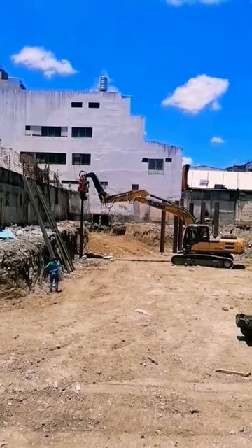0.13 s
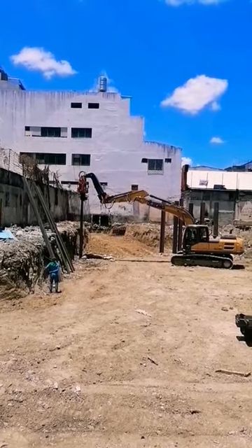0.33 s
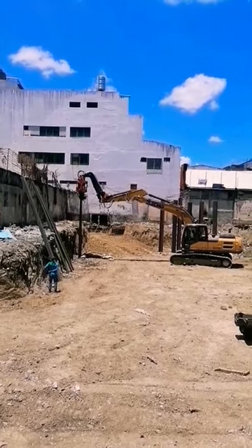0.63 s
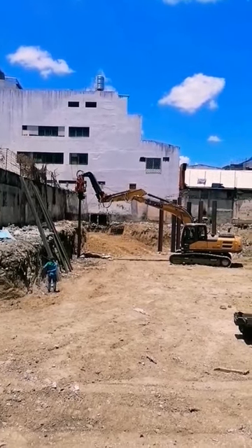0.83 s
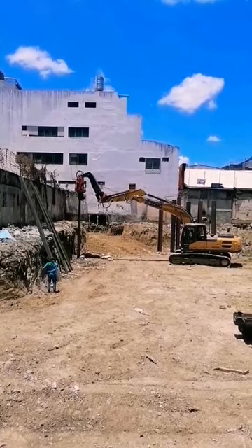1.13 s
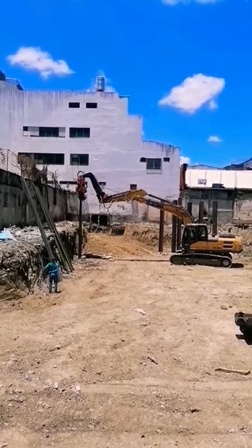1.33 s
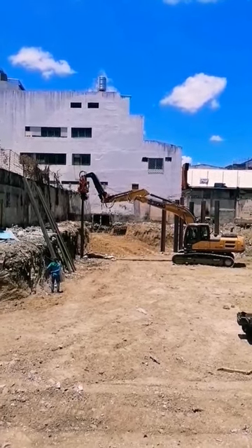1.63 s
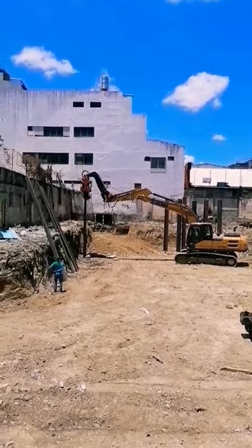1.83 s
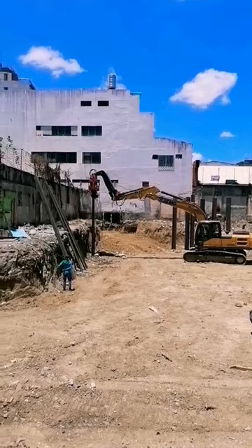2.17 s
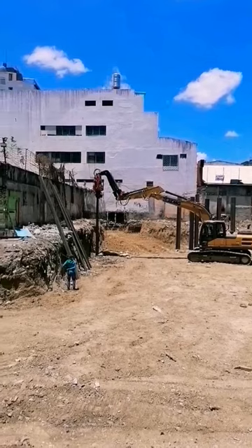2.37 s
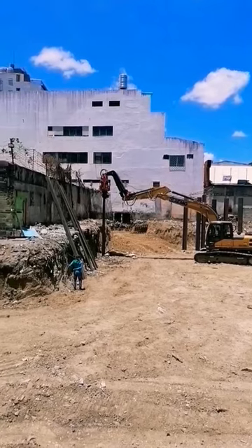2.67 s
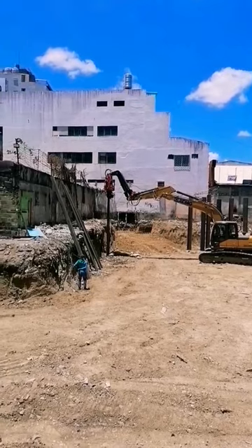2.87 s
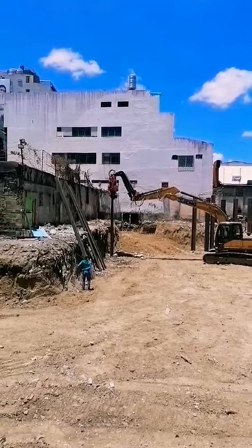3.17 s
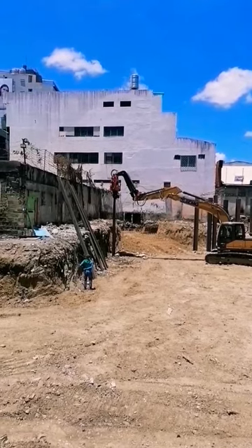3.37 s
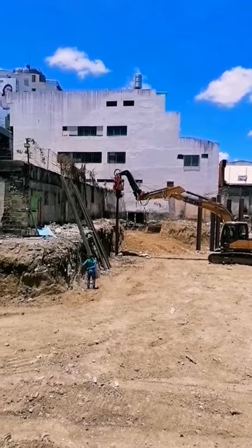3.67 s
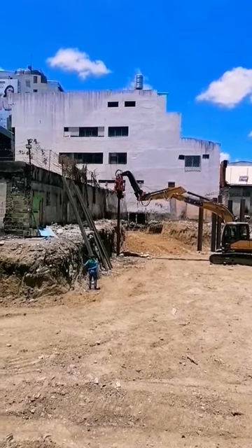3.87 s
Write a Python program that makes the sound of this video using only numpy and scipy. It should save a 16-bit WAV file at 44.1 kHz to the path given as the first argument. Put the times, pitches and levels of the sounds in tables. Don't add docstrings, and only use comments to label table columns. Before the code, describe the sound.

Pile driving with a vibrating hammer, heard across a walled building site on a phone: quiet low engine drone and hydraulic whine first, then loose clamp clanks, ground thuds and fast, uneven steel hammering to the end.

```python
import sys
import numpy as np
from scipy import signal
from scipy.fft import rfft, irfft, next_fast_len
from scipy.io import wavfile
from scipy.ndimage import map_coordinates

SR = 44100
rng = np.random.default_rng(int(sys.argv[2]) if len(sys.argv) > 2 else 0)


def elevation(decibels):
    levels = np.asarray(decibels, float)
    return 10 ** (levels / 20)


def transcribe(signal):
    frames = np.atleast_2d(signal).T
    limited = np.clip(frames, -1, 1)
    pcm = np.round(limited * 32767).astype(np.int16)
    wavfile.write(sys.argv[1], SR, pcm)


N = 176400
TIME_S = np.arange(N) / SR


def unit(x):
    return x / np.sqrt(np.mean(x ** 2) + 1e-20)


def along(points, hz):
    f, v = np.transpose(points)
    return np.interp(np.log(hz + 1), np.log(f + 1), v)


def curves(rows):
    s, *cols = np.transpose(rows)
    return [np.interp(TIME_S, s, c) for c in cols]


def wobble(rate_hz):
    knots = rng.standard_normal(int(N * rate_hz / SR) + 4)
    return map_coordinates(knots, [np.arange(N) * rate_hz / SR])


def phase(hz):
    return 2 * np.pi * np.cumsum(hz) / SR


def filtered(x, response):
    m = next_fast_len(N + SR // 2)
    return irfft(rfft(x, m) * response(np.fft.rfftfreq(m, 1 / SR)), m)[..., :N]


def shaped(x, points):
    return unit(filtered(x, lambda f: elevation(along(points, f))))


def ringing(modes):
    def response(f):
        total = 0
        for k, (center, width, db) in enumerate(modes):
            damping = 1j * f * width
            total = total + (-1) ** k * elevation(db) * damping / (center ** 2 - f * f + damping)
        return total
    return response


def air(f):
    air_hz = 5360
    return 1 / (1 + 1j * f / air_hz) ** 3


def far_ringing(modes):
    return lambda f: ringing(modes)(f) * air(f)


def grit(per_s, spread_db):
    chance, sign, size = rng.random((3, N))
    size_db = np.minimum(-spread_db * np.log(size + 1e-9), 12)
    return unit((chance < per_s / SR) * np.sign(sign - .5) * elevation(size_db))


def bursts(times_s, db, attack_s, hold_s, t60_s):
    t = np.clip(TIME_S - np.asarray(times_s)[:, None], 0, None)
    fall_db = 60 * np.clip(t - hold_s, 0, None) / t60_s
    each = elevation(np.asarray(db)[:, None] - fall_db) * (1 - np.exp(-t / attack_s))
    return np.sqrt(np.sum(each ** 2, axis=0))


# t/s, f/Hz, level/dB
FIRING = [
    (0, 65.1, -35),
    (.45, 66.1, -35.5),
    (.75, 66.1, -37),
    (1.75, 66.9, -40),
    (1.9, 67.06, -40),
    (2.2, 67.3, -41),
    (2.45, 65.4, -35.5),
    (2.75, 64.82, -36),
    (3.2, 65.6, -39),
    (4, 67.8, -38),
]
# t/s, f/Hz, level/dB
PUMP = [
    (0, 578, -60),
    (.25, 589.6, -48),
    (.45, 597.3, -43.5),
    (.75, 600.4, -42),
    (1.2, 602, -40.5),
    (1.95, 603, -39),
    (2.12, 608, -44.5),
    (2.4, 603, -48.5),
    (2.6, 592, -62),
]
# multiple of firing, level/dB under it
EXHAUST_ORDERS = [(2, -11.5), (3, -6.5), (4, -35)]
# f/Hz, level/dB per Hz
BLOCK = [(25, -18), (50, -6), (85, -8), (200, -6.5), (345, -15), (800, -22.5), (5000, -41), (9000, -48.5),
         (15000, -59)]
# f/Hz, width/Hz, level/dB
PANELS = [(190, 21, -3), (384.3, 7.2, -2.5), (560, 120, -6), (1263, 112, -13.5), (1614, 137, -15),
          (2270, 190, -19), (2650, 230, -21), (3880, 72, -25), (5000, 95, -23.5), (5450, 97, -21.5)]


def engine():
    firing_hz, firing_db = curves(FIRING)
    turn = phase(firing_hz + 1.03 * wobble(12))
    exhaust = elevation(0.29 * wobble(21)) * np.sin(turn)
    for multiple, db in EXHAUST_ORDERS:
        exhaust += elevation(db + 1.6 * wobble(22.2)) * np.sin(multiple * turn + 0.39 * wobble(9))
    pump_hz, pump_db = curves(PUMP)
    whine = elevation(pump_db + 0.74 * wobble(24.84)) * np.sin(phase(pump_hz + 2.25 * wobble(29.63)))
    block = shaped(rng.standard_normal(N), BLOCK)
    knock = 1 + 0.13 * np.sin(turn + 1.0)
    panels = unit(filtered(grit(7000, 1.8) * knock, far_ringing(PANELS)))
    ease_s, ease_db = 2.04, -0.5
    ease = ease_db * np.clip((TIME_S - ease_s) * 10, 0, 1)

    def swell():
        return elevation(ease + 0.14 * wobble(0.65) + 0.12 * wobble(11))

    tones = np.sqrt(2) * (elevation(firing_db) * exhaust + whine)
    return tones + elevation(-37) * block * swell() + elevation(-41) * panels * swell()


# t/s, f/Hz, level/dB
SQUEAKS = [(.03, 5390, -57), (.3, 5450, -58), (.36, 3960, -54), (.62, 4000, -55), (.63, 5537, -62),
           (.74, 5000, -68), (1.01, 5000, -62), (1.419, 5000, -58), (1.44, 3360, -55), (1.69, 5000, -62)]


def squeaks():
    total = np.zeros(N)
    for s, hz, db in SQUEAKS:
        song = unit(filtered(rng.standard_normal(N), ringing([(hz, 45, 0)])))
        total += song * bursts([s], [db], 0.033, 0.038, 0.27)
    return total


# t/s, peak level/dB, low share/dB, 66 Hz swell level/dB
CLANKS = [(2.537, -38.5, 17, -36), (2.601, -27.5, 6, -30), (2.687, -51, 20, -44), (2.766, -24, -0.5, -33),
          (2.803, -29, 9, -24), (2.851, -18, 1, -41), (2.9, -22, -4.5, -25), (2.937, -29, 2, -16.5),
          (2.971, -12.5, -9.5, -36), (2.994, -11.5, -10, -32), (3.009, -33, 2, -16.5),
          (3.037, -14, -6.5, -35)]
# f/Hz, width/Hz, level/dB
CLAMP_LOW = [(592, 35, -0.5), (806, 27, -20), (895, 7.8, -3), (984, 46, -5), (1108, 134, -10),
             (1298, 200, -12.5), (1546, 24, -8)]
CLAMP_HIGH = [(1790, 56, -22), (2236, 38, -2), (2334, 99, -8), (2687, 62, -7.5), (2800, 75, -14.5),
              (3286, 27, -10.5), (3730, 29, -23), (4090, 19, -14)]


def clamp():
    s, db, low_db, thud_db = np.transpose(CLANKS)
    high_hits = grit(12000, 1.7) * bursts(s, db + 15.5, 0.0017, 0.0023, 0.13)
    high = filtered(high_hits, far_ringing(CLAMP_HIGH))
    low_hits = grit(9000, 0.58) * bursts(s, db + low_db + 16.5, 0.00061, 0.0028, 0.16)
    low = filtered(low_hits, far_ringing(CLAMP_LOW))
    crack_noise = rng.standard_normal(N) * bursts(s, db + 8, 0.0028, 0.0024, 0.028)
    crack = filtered(crack_noise, lambda f: 1j * f / (1j * f + 700) * air(f) ** 2)
    thud = bursts(s, thud_db, 0.017, 0.015, 0.13) * np.sin(phase(66 + 3 * wobble(24.6)))
    return high + low + crack + thud


def struck(rows, rise_s, t60_s):
    out = np.zeros(N + SR)
    t = np.arange(SR // 4) / SR
    shape = (1 - np.exp(-(t / rise_s) ** 2)) * elevation(-60 * t / t60_s)
    shape /= shape.max()
    for s, hz, db in rows:
        start = round((s - rise_s) * SR)
        out[start:start + len(t)] += elevation(db) * shape * np.sin(2 * np.pi * hz * t)
    return out[:N]


# t/s, peak level/dB
SNAPS = [(2.542, -22), (3.148, -9), (3.221, 0), (3.2374, -20), (3.2942, -14), (3.3237, -20), (3.3824, -19),
         (3.5315, -16), (3.5529, -1), (3.6, -10), (3.774, -2), (3.7897, -11), (3.831, -2), (3.848, -10),
         (3.9134, -19), (3.9708, -18)]
# t/s, f/Hz, peak level/dB
RINGS = [(3.073, 533, -22.5), (3.075, 445, -17.5), (3.145, 837, -21.5), (3.151, 560, -15),
         (3.151, 430, -14), (3.215, 1086, -23.5), (3.221, 901, -22), (3.223, 257, -15), (3.223, 1320, -26),
         (3.227, 522, -15), (3.275, 631, -19), (3.285, 830, -24), (3.287, 1071, -22), (3.296, 420.6, -16.5),
         (3.306, 610, -27), (3.312, 325, -21), (3.342, 252, -25.5), (3.352, 1062, -22), (3.366, 499, -18),
         (3.37, 1527, -28), (3.412, 538, -18), (3.464, 1093, -29), (3.464, 442, -26), (3.47, 556, -20.5),
         (3.528, 1060, -27), (3.532, 412, -24.5), (3.536, 193, -18), (3.568, 592, -27), (3.594, 486, -21.5),
         (3.604, 196, -18), (3.622, 528, -35), (3.65, 1030, -23.5), (3.674, 572, -19.5), (3.72, 218, -21),
         (3.763, 513, -19.5), (3.763, 1360, -24.5), (3.773, 614, -25), (3.825, 510, -37),
         (3.827, 1242, -24), (3.831, 1141, -20.5), (3.933, 576, -24), (3.965, 511, -23)]
# t/s, f/Hz, level/dB
PINGS = [(3.165, 6070, -35), (3.375, 6080, -45), (3.64, 6060, -38), (3.85, 5800, -36), (2.99, 4090, -35.5),
         (3.31, 4060, -36)]
# t/s, f/Hz, level/dB
CLAMP_NOTES = [(2.6, 900, -39.5), (2.68, 895, -37.5), (2.6, 2270, -42), (2.8, 600, -32), (2.85, 620, -24),
               (2.93, 615, -42), (3.03, 4100, -40), (3.2, 4110, -42.5), (3.38, 4100, -37)]


def strikes():
    s, db = np.transpose(SNAPS)
    kicks = np.bincount(np.round(s * SR).astype(int), elevation(db), N)
    snaps = filtered(kicks, far_ringing([(1000, 640, 17)]))
    rings = elevation(0.5) * struck(RINGS, 0.005106, 0.15)
    pings = struck(PINGS, 0.0053, 0.066)
    return snaps + rings + pings + struck(CLAMP_NOTES, 0.0057, 0.44)


# t/s, pile level/dB, deep boom relative to it/dB
BLOWS = [(3.08, -19, -27), (3.144, -8.5, -1), (3.219, -10, -10), (3.291, -10.5, -13), (3.364, -10.5, -19),
         (3.435, -11, -14), (3.473, -14, -29), (3.528, -8, -4.5), (3.603, -13, -16), (3.659, -11, -20),
         (3.729, -14.5, -16), (3.769, -14, -21), (3.829, -8, -30), (3.898, -11.5, -17), (3.958, -11.5, -33)]
# t/s, pile rattle level/dB, jaw chatter level/dB
SHAKE = [
    (2.5, -75, -91),
    (2.6, -53, -45),
    (2.75, -40, -38),
    (2.98, -32.5, -26.5),
    (3.1, -21.5, -28.5),
    (3.3, -18, -27),
    (3.6, -19.5, -28),
    (4, -19, -33),
]
# f/Hz, width/Hz, level/dB
PILE = [(415, 41, -1), (529, 63, -1), (576.6, 27, 0), (639, 28, -8), (850, 41, -14.5), (939, 11, -8.5),
        (1044, 65, -10), (1164, 39, -2.5), (1277, 180, -11), (1497, 71, -4.5), (1670, 32, -8),
        (1865, 38, -5.5)]
PILE_DEEP = [(192.3, 13.4, 2.5), (252.5, 25, -0.5), (299.6, 15.7, -1)]
# f/Hz, level/dB per Hz
PILE_BROAD = [(59, -27), (100, -7), (188, -6.5), (352, -5.5), (547, -6.5), (704, -5), (1120, -9),
              (2750, -14), (15100, -55)]
# f/Hz, level/dB per Hz
HISS = [(2650, -12), (4500, -4), (6380, -4.5), (9180, -5), (11600, -13), (15100, -13)]
# t/s, hiss level/dB
SPRAY = [(3.1707, -55), (3.223, -26.5), (3.299, -27), (3.3717, -26), (3.4844, -29), (3.5294, -27),
         (3.667, -20.5), (3.792, -27), (3.846, -24), (3.9144, -30), (3.96, -27.5)]


def hammer():
    s, db, boom_db = np.transpose(BLOWS)
    rattle, chatter = elevation(curves(SHAKE))
    clatter = bursts(s, db - 6.5, .001, .024, .15)
    contact = bursts(s, db - 1.5, .0004, .001, .012)
    blows = np.hypot(clatter, contact)
    booms = bursts(s, db + boom_db - 7, 0.0033, 0.011, 0.2)
    grip_s, grip_rise_s = 3.06, 0.0062
    grip = 1 / (1 + np.exp(np.clip((grip_s - TIME_S) / grip_rise_s, -50, 50)))

    def drive(hits):
        return np.hypot(rattle * elevation(1.8 * wobble(28)), hits * elevation(1.6 * wobble(45)))

    def jaws():
        return np.hypot(chatter * elevation(4.17 * wobble(23.9)), elevation(-14) * blows)

    def steel(modes, envelope):
        return unit(filtered(grit(4000, 2.3) * envelope, far_ringing(modes))) * np.std(envelope)

    pile = steel(PILE, drive(blows) * grip)
    deep = steel(PILE_DEEP, drive(booms) * grip)
    head = steel(CLAMP_HIGH, jaws()) * elevation(-5.5) + steel(CLAMP_LOW, jaws()) * elevation(-1.5)
    broad = shaped(grit(6000, 2.5), PILE_BROAD) * drive(blows) * (0.25 + 0.63 * grip)
    spray_s, spray_db = np.transpose(SPRAY)
    spray = np.hypot(elevation(-22) * rattle, bursts(spray_s, spray_db - 4, 0.0014, 0.0053, 0.065))
    hiss = shaped(grit(9000, 1.3), HISS) * spray
    return elevation(-6) * pile + elevation(-6.5) * deep + head + elevation(-6) * broad + hiss


def tail(decays, length):
    hz, t, z = signal.stft(rng.standard_normal(length), SR, nperseg=256)
    fall = elevation(-60 * t / along(decays, hz)[:, None])
    h = signal.istft(z * fall, SR, nperseg=256)[1]
    return h / np.linalg.norm(h)


# f/Hz, t60/s
WALLS = [(200, 0.26), (2000, 0.59), (10000, 0.22)]


def stereo(x, alike, lead, lean):
    answer = signal.fftconvolve(x, tail(WALLS, SR // 2))[:N]

    def shares(hz):
        angle = np.arccos(np.clip(along(alike, hz), 0, 1)) / 2
        return np.array([np.cos(angle), np.sin(angle)])

    direct, walls = filtered(np.array([x, answer]), shares)
    side = np.array([[.5], [-.5]])

    def ports(hz):
        return elevation(side * along(lean, hz)) * np.exp(1j * side * along(lead, hz))

    return filtered(np.array([direct + walls, direct - walls]), ports)


# f/Hz, correlation
ALIKE_ENGINE = [(60, 1), (240, 0.92), (940, 0.86), (3700, 0.72), (14600, 0.03)]
ALIKE_PILE = [(60, 0.98), (240, 0.98), (940, 0.9), (3700, 0.62), (14600, -0.28)]
# f/Hz, lead/rad
LEAD_ENGINE = [(60, 0.26), (300, 0.28), (1000, -0.79), (2000, 1.26), (5000, -1.05)]
LEAD_PILE = [(100, 0.1), (500, 0.22), (1400, 1.2), (2100, 1.65), (4000, 0.69), (8000, 7.9)]
# f/Hz, level/dB
LEAN_ENGINE = [(60, -3.5), (180, 0), (540, -2), (1620, -1.5), (4870, -1.5), (14600, 1)]
LEAN_PILE = [(60, -5), (180, 0.5), (540, 0.0), (1620, -2.5), (4870, -1), (14600, -1)]


def scene():
    machine = stereo(engine() + squeaks(), ALIKE_ENGINE, LEAD_ENGINE, LEAN_ENGINE)
    piling = stereo(clamp() + strikes() + hammer(), ALIKE_PILE, LEAD_PILE, LEAN_PILE)
    return machine + piling


def low_pass(x):
    return signal.sosfilt(signal.butter(12, 15220, fs=SR, output="sos"), x)


def record(dry):
    soft = dry / (1 + np.abs(dry / .85) ** 6) ** (1 / 6)
    return low_pass(soft)


dry = scene()
out = record(dry)
transcribe(out)
```